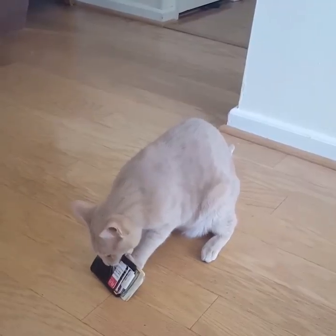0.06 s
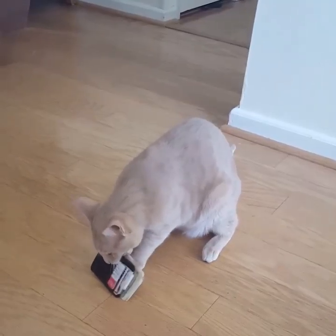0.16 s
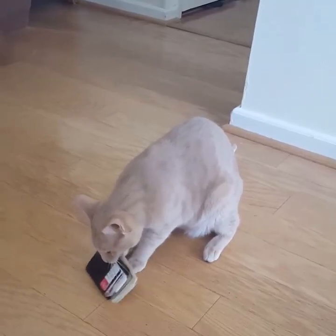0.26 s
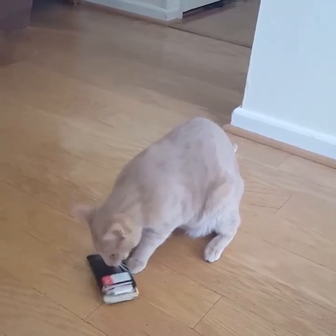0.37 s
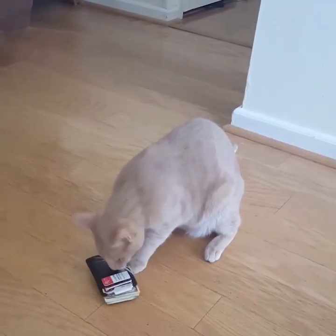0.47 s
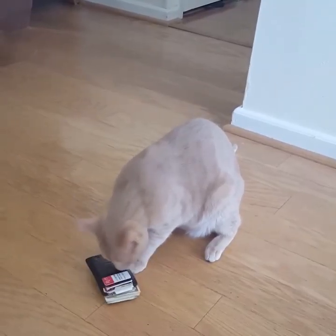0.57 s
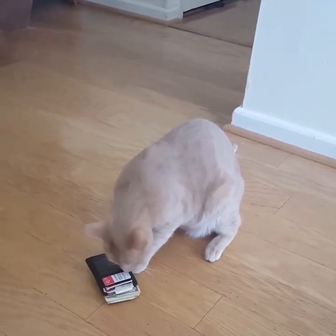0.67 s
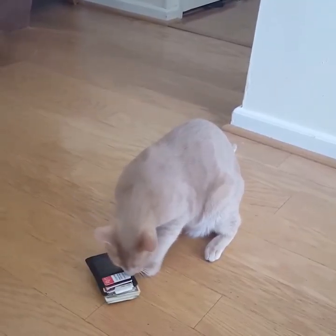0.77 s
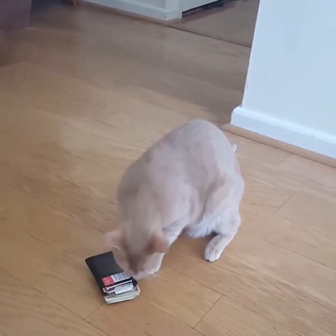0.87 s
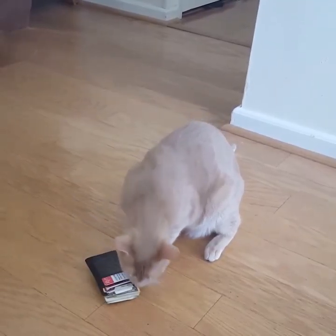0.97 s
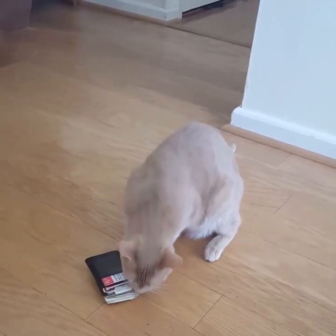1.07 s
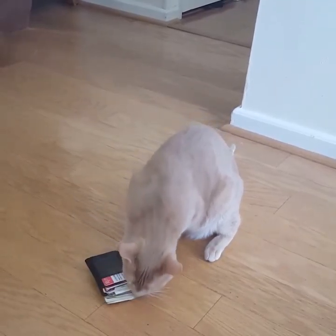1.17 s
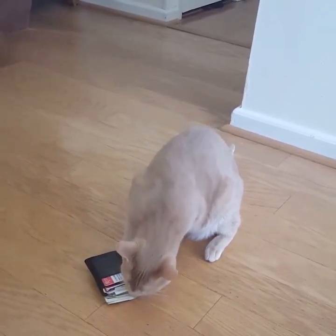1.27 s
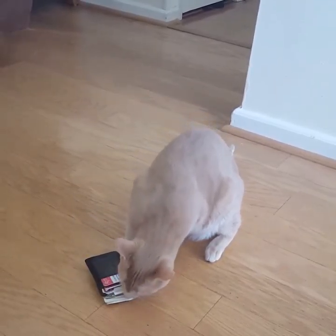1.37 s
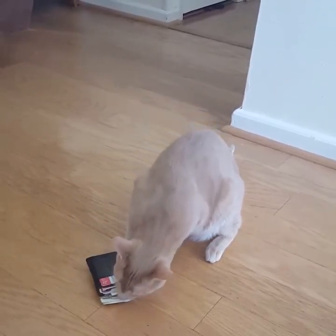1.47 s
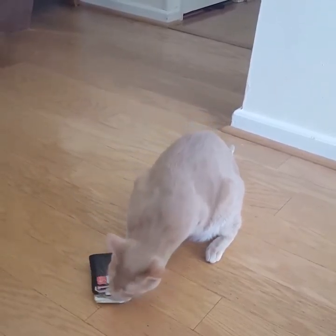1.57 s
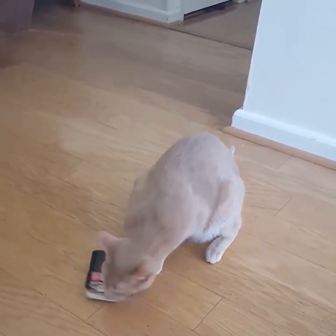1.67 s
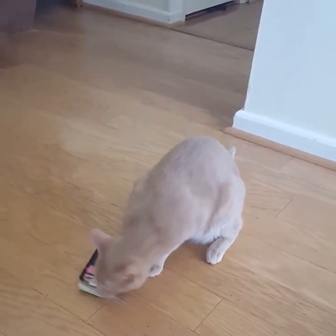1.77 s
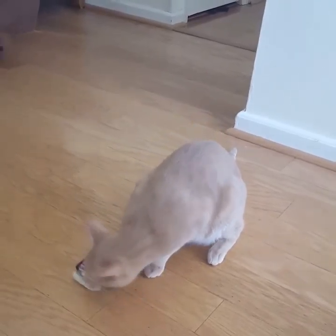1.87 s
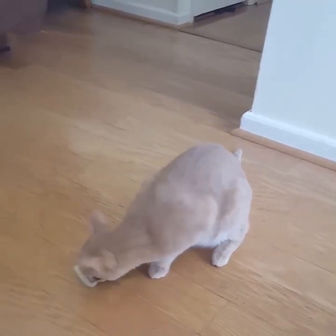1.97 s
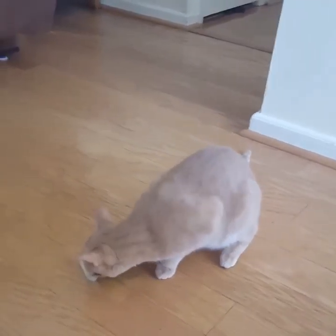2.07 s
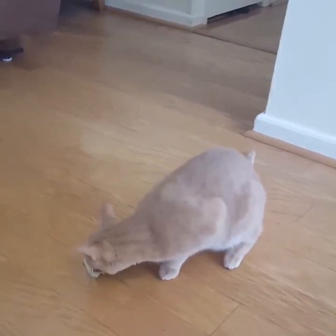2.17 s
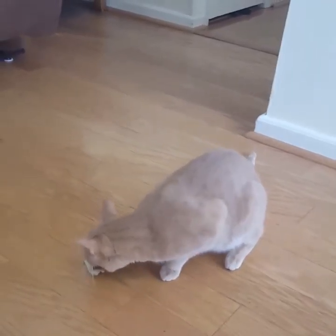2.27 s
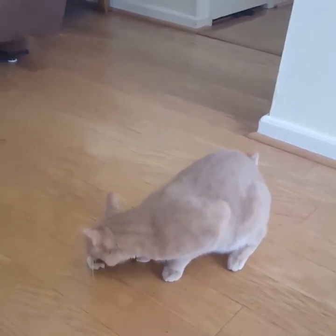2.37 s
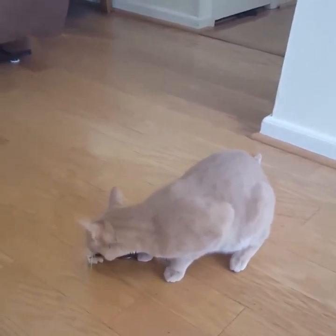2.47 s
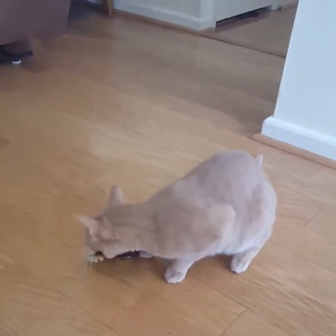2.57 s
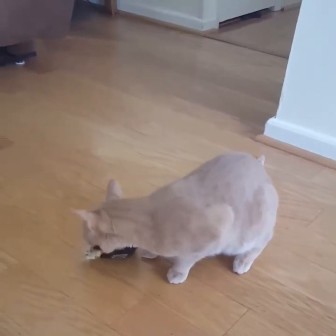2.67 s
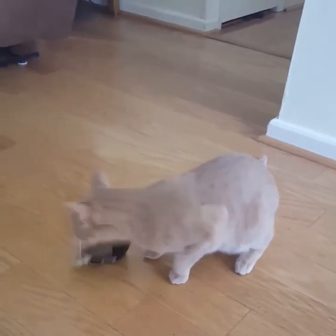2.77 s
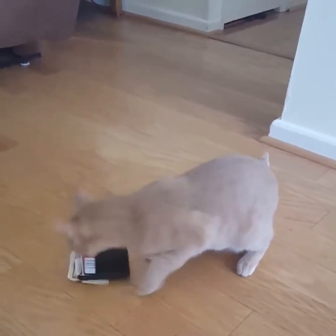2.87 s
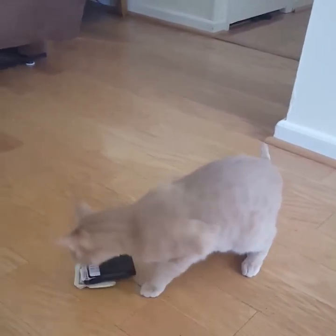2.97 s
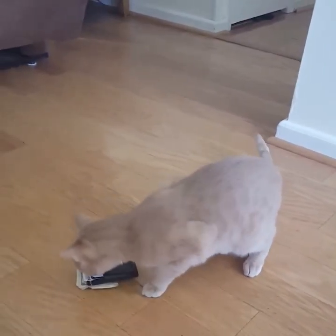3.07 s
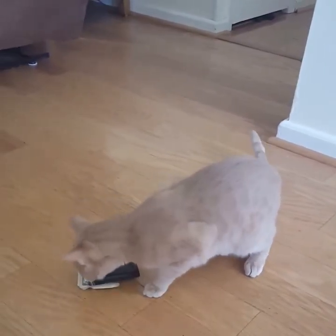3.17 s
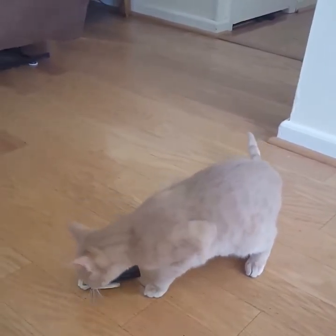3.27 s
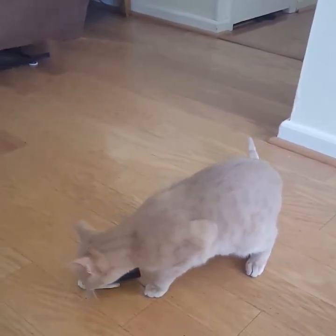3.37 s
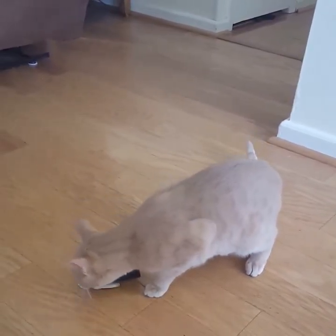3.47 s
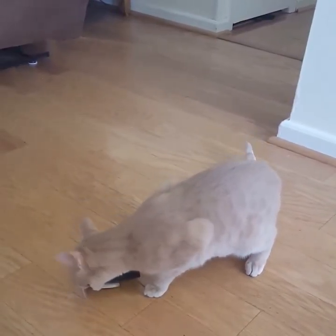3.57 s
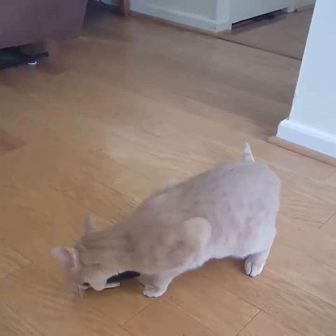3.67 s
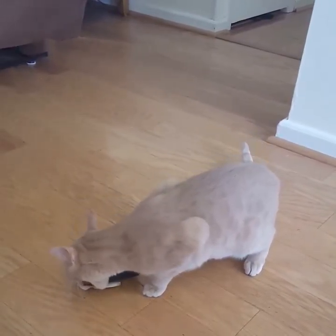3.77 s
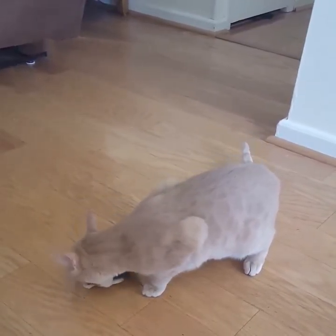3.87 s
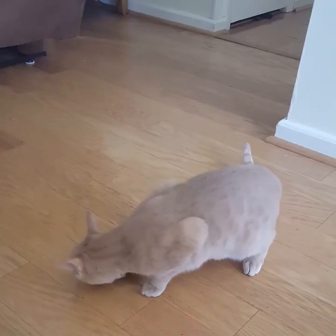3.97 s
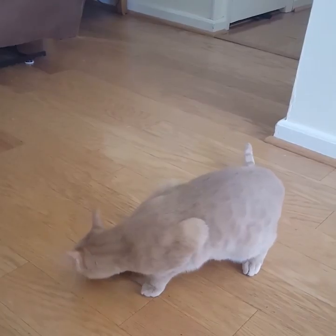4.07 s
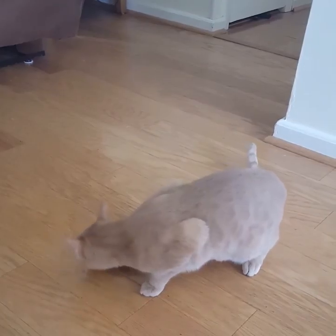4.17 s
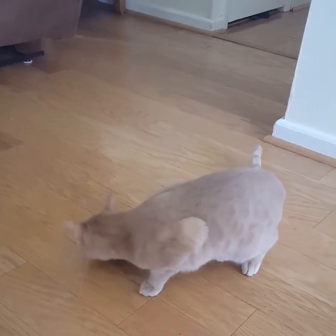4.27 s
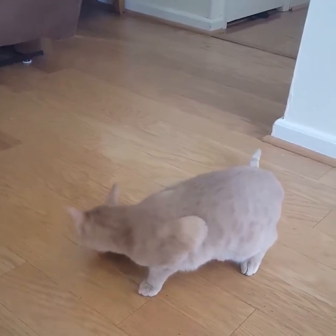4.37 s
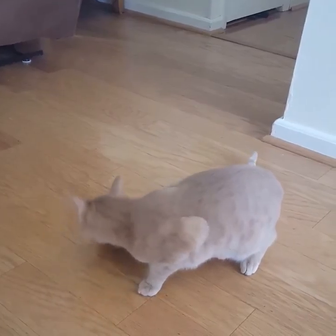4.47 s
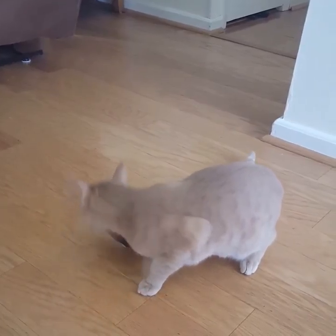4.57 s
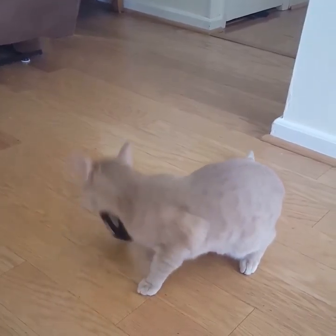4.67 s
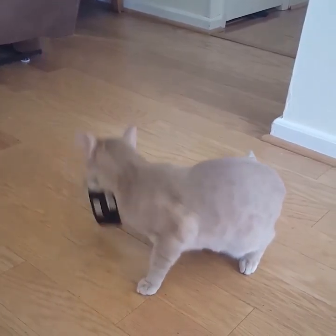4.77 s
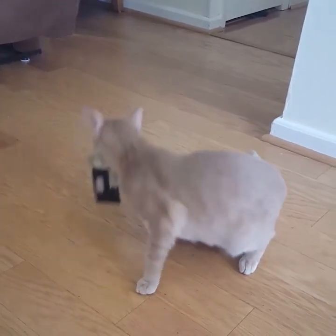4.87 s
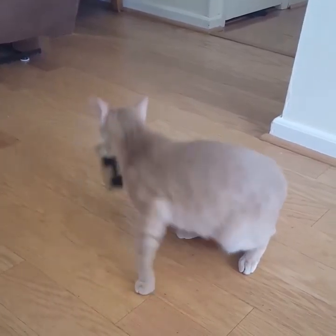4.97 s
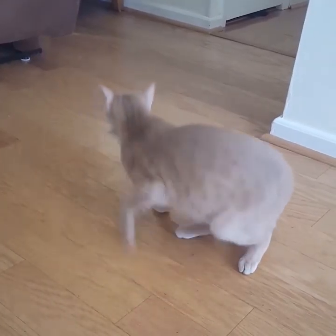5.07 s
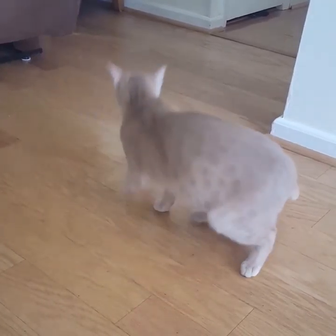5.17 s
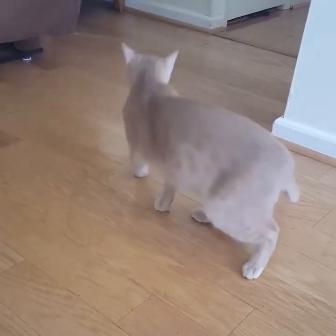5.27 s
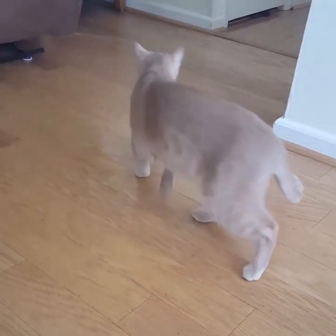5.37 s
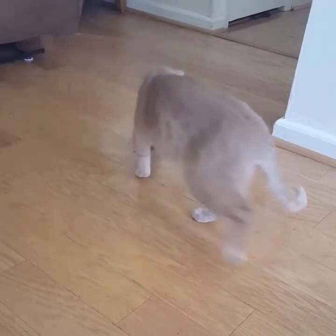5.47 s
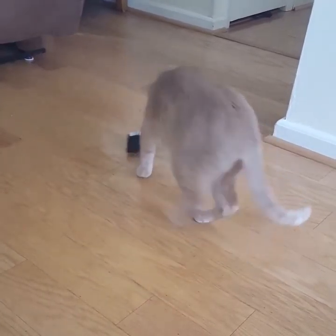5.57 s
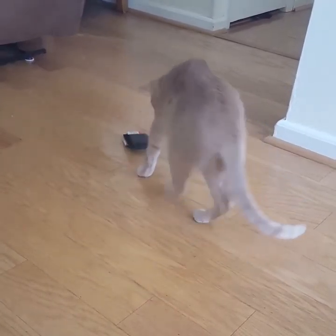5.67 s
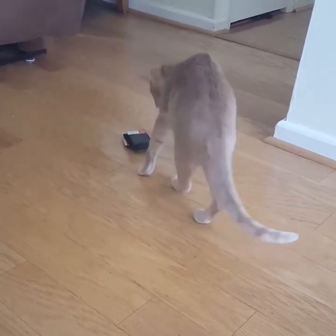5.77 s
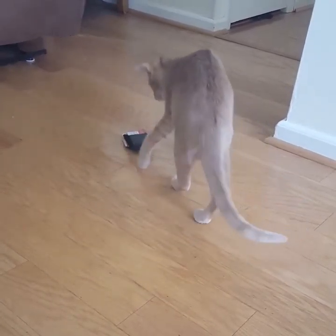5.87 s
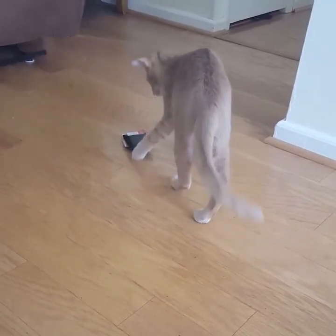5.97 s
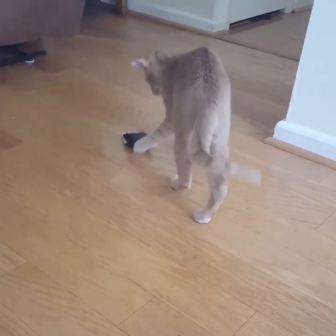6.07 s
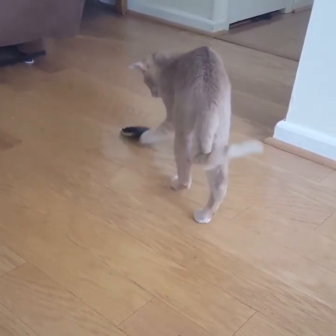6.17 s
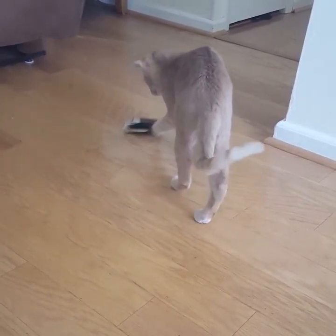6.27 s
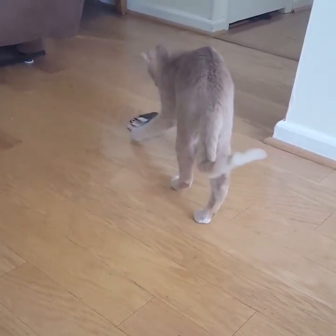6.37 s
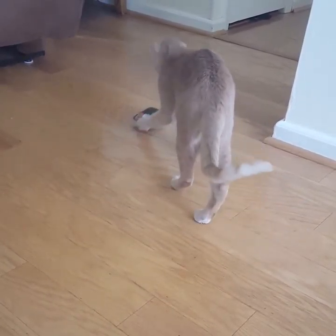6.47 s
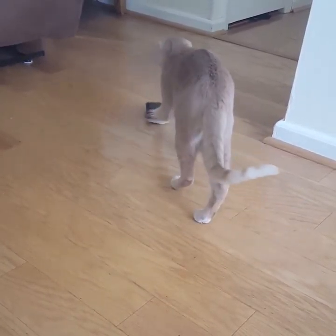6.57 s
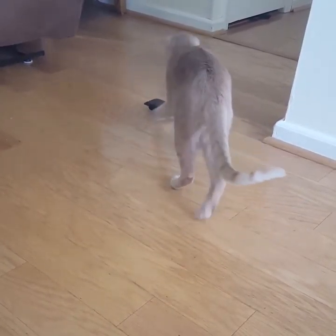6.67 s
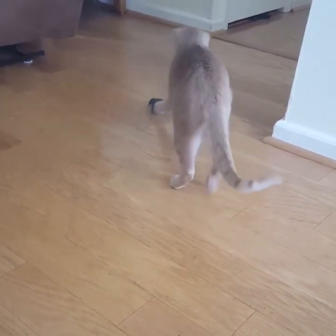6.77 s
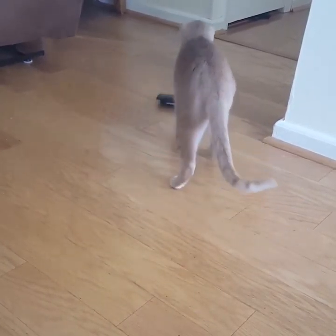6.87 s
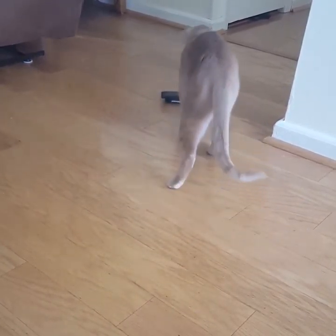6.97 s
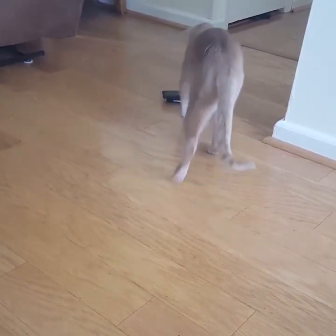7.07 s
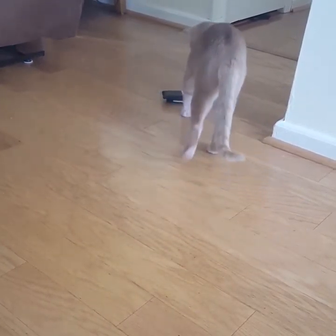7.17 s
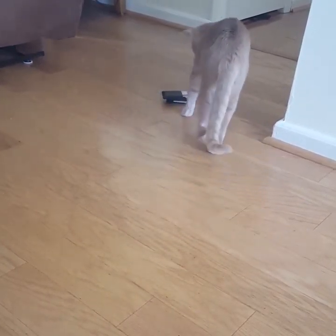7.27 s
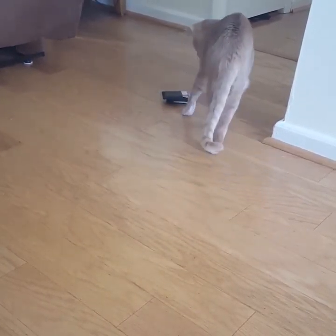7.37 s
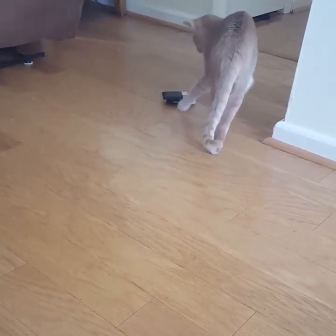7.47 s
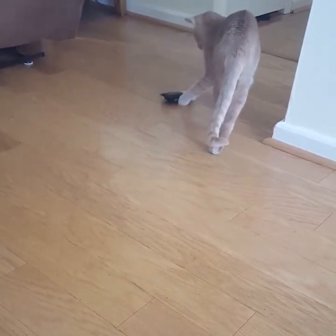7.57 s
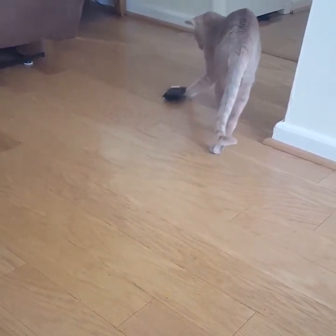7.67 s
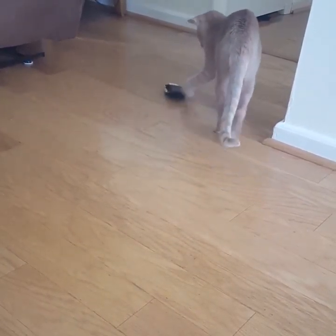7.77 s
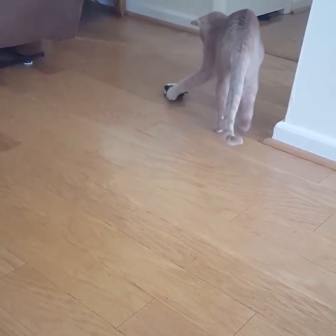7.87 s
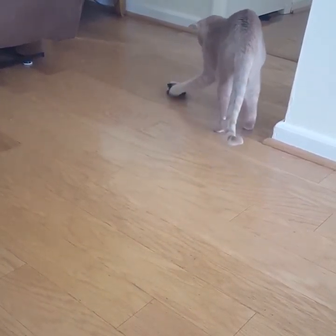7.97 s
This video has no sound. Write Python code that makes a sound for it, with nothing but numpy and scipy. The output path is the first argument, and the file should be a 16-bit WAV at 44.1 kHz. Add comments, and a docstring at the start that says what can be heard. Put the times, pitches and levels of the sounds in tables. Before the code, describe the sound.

A card-filled wallet knocks, scrapes and clatters on a wooden floor in a lively room, over a faint steady motor hum.

```python
"""Cat batting a wallet

A cat paws a card-filled wallet over a wooden floor, lifts it, drops it and bats it along.
Impacts are short pressure pulses that drive dying modes; claws, teeth and cards add noise bursts.
Friction is noise shaped by sliding speed: a rasp of random slips, a smooth swish, judder and squeaks.
Echoes and a diffuse tail form a bare, lively room, where a motor, probably a refrigerator's,
hums faintly as wavering sines over the noise of the air."""
import sys
import numpy as np
from scipy import signal
from scipy.fft import rfft, irfft
from scipy.io import wavfile

SR = 44100
rng = np.random.default_rng(int(sys.argv[2]) if len(sys.argv) > 2 else 0)


def to_wav(s):
    """Save 16-bit WAV."""
    ch = np.atleast_2d(s).T  # columns
    pcm = np.round(np.clip(ch, -1, 1) * 32767)  # PCM
    wavfile.write(sys.argv[1], SR, pcm.astype(np.int16))


N = 354123  # samples

# Blows of wallet on floor (low contact = soft face, high = hard edge):
# start_s, strength_db, contact_hz, ring_db (relative)
BLOWS = [(0.409, -33, 1460, 4), (0.414, -33.5, 2200, 6), (0.5976, -12.5, 1820, 8), (0.6018, -32, 2630, 8),
         (0.6214, -17, 2350, 9), (0.659, -39, 2750, 0), (0.6807, -28, 2210, -6), (0.7008, -22, 1700, 7),
         (2.036, -36, 1490, 1), (2.134, -42, 1100, -6), (2.158, -31, 1860, 0), (2.955, -46, 1510, 7),
         (3.0175, -29, 684, -1), (3.0837, -12, 2070, 1), (3.096, -13.5, 1740, 8), (3.1986, -14.5, 1960, 5),
         (3.2617, -32, 2140, 8), (3.866, -42, 1080, -5), (4.019, -36, 1510, 5), (4.129, -37.5, 1900, -3),
         (4.167, -34.5, 2100, -1), (4.33, -39, 1520, 13), (5.624, -24.5, 486, 5), (5.6363, -21, 750, 3),
         (5.6411, -18, 507, 0), (5.645, -18, 1900, -3), (5.6561, -10, 1340, 6), (5.6586, -20, 384, 3),
         (5.6608, -5, 2780, 5), (5.6645, -10.5, 2350, 16), (5.8134, -11, 1840, 6), (5.8229, -16, 2060, 11),
         (5.8405, -18.5, 1780, 3), (5.9052, -15, 2130, 6.5), (6.0064, -28.5, 1820, -1),
         (6.4941, -27, 890, 18), (6.499, -23, 2020, 3), (6.5748, -25.5, 1490, -5), (6.6922, -27, 1830, 2),
         (6.7604, -29.5, 1610, 10), (6.9799, -38, 1400, 15), (7.093, -20.5, 1300, -2),
         (7.9119, -28.5, 1499, 3), (7.932, -28, 1800, 6)]
# Modes of wallet and boards ringing together: pitch_hz, level_db (relative), t60_s
FLOOR_MODES = [(261.5, -20.5, 0.26), (404, -26, 0.2), (613, -24, 0.073), (860, -53, 0.04), (1103, -25, 0.1),
               (1340, -31, 0.01), (1644, -40, 0.17), (1870, -18, 0.019), (2380, -48, 0.018),
               (3310, -29, 0.027), (5000, -38, 0.011)]
# The cat carries the wallet away, so the room gains on the direct sound: time_s, distance_m
CAT_DISTANCE = [(0, 0.98), (4.8, 0.99), (5.7, 1.11), (6.5, 1.82), (8, 1.73)]
# The wallet never lands square: its far edge follows, weaker and a little harder
FAR_EDGE_DELAY_S, FAR_EDGE_DB, FAR_EDGE_HZ_RATIO = 0.003, -7, 1.32
# Every blow shakes the cards: level for a usual blow, and dB of growth per dB of blow
CARDS_DB, USUAL_BLOW_DB, CARDS_GROWTH = -48.5, -17, 0.51
CARDS_HZ, CARDS_DECAY_S = 4400, 0.001


def knocks(room_db=2, ring_db=0):
    """Impact excitation: two edges clap in turn, drive the modes and shake the cards."""
    out = np.zeros(N)
    for start_s, strength_db, contact_hz, own_ring_db in BLOWS:
        clap = contact(contact_hz)
        far_edge = gain_of(FAR_EDGE_DB) * contact(contact_hz * FAR_EDGE_HZ_RATIO)
        add(clap, FAR_EDGE_DELAY_S * rng.uniform(0.63, 1.4), far_edge)
        ring = signal.fftconvolve(clap, ringing(FLOOR_MODES))[:len(clap)]
        ring = ring / abs(contact(contact_hz)).sum()
        cards_db = CARDS_DB + CARDS_GROWTH * (strength_db - USUAL_BLOW_DB)
        cards = gain_of(cards_db) * scratch(CARDS_HZ, CARDS_DECAY_S)
        blow = gain_of(strength_db) * (clap + gain_of(ring_db + own_ring_db) * ring) + cards
        distance_m = np.interp(start_s, *np.transpose(CAT_DISTANCE))
        add(out, start_s, heard(blow, room_db + 20 * np.log10(distance_m)))
    return out


# Colour of the card-filled wallet: frequency_hz, level_db (relative)
WALLET_COLOUR = [(100, -3), (270, -2.5), (450, 4), (800, 3.5), (1300, -0.5), (1800, 0), (2400, -1.5),
                 (3300, 2), (4200, 4), (6500, 7), (9000, 4), (15000, -21)]


def contact(hz, damping=1.0, size=8192):
    """Impulsive radiation: a stopped flat object pushes air one way, then back; harder is quicker."""
    s = 1j * np.fft.rfftfreq(size, 1 / SR) / hz
    push_and_return = s / (s ** 2 + damping * s + 1) ** 2
    pulse = irfft(causal(WALLET_COLOUR, size) * push_and_return)
    return -pulse / abs(pulse).max()


def causal(spectrum, size):
    """Minimum phase: the given colour becomes a response that starts only at the blow."""
    log_gain = np.log(gain_of(read(spectrum, abs(np.fft.fftfreq(size, 1 / SR)))))
    return np.exp(np.conj(signal.hilbert(log_gain)))[:size // 2 + 1]


def ringing(modes, size=8192):
    """Modal decay: a sum of dying sines, weighted anew at each point of contact."""
    t = np.arange(size) / SR
    weights = rng.uniform(0.55, 0.89, len(modes))
    out = np.zeros(size)
    for weight, (hz, db, t60) in zip(weights, modes):
        out += weight * gain_of(db - 60 * t / t60) * np.sin(2 * np.pi * hz * t)
    return out


# Claws, teeth and card edges catching: start_s, level_db, centre_hz, decay_s
CATCHES = [(0.409, -48, 6240, 0.0056), (0.656, -48, 8800, .002), (1.922, -58, 5940, .01),
           (2.441, -53, 3430, 0.0037), (2.709, -48, 3100, .004), (3.015, -51, 7000, .008),
           (3.0171, -44, 2380, 0.0033), (3.052, -53, 4770, .011), (3.083, -45, 4460, .003),
           (3.203, -47, 4050, .003), (4.235, -53, 5930, .0043), (4.499, -53, 5250, .0079),
           (5.636, -40.5, 3300, 0.04), (5.813, -38, 5300, 0.0045), (5.901, -45, 4100, 0.0024),
           (7.932, -39.5, 7800, 0.00088)]


def ticks(room_db=0):
    """Transient noise: catches are brief bright scratches."""
    out = np.zeros(N)
    for start_s, level_db, centre_hz, decay_s in CATCHES:
        add(out, start_s, gain_of(level_db) * heard(scratch(centre_hz, decay_s), room_db))
    return out


def scratch(hz, decay_s, size=8192):
    """Damped noise: a band around one frequency dies away exponentially."""
    band = [(hz / 4, -16), (hz, 0), (hz * 2, -6), (hz * 4, -20)]  # Hz, dB
    noise = coloured(rng.standard_normal(size), band)
    return noise * np.exp(-np.arange(size) / SR / decay_s)


# Shoves that slide the wallet: top_speed_s, push_s, coast_s,
# rasp_db (edge, relative), swish_db (leather, relative)
SHOVES = [(0.522, 0.063, 0.06, -55.5, -47.5), (1.75, 0.22, 0.3, -65, -71), (1.93, .14, 0.2, -54, -65),
          (2.13, .15, 0.15, -53, -63), (2.26, 0.07, 0.28, -60, -65), (2.70, 0.15, .08, -67, -67),
          (4.2, 0.12, 0.15, -52.5, -56.5), (4.335, 0.09, 0.16, -50.5, -61.5),
          (4.48, 0.071, 0.075, -53, -67), (4.92, 0.15, 0.27, -79, -74), (5.5, .22, 0.12, -69, -73),
          (6.27, 0.085, 0.062, -58, -65), (6.325, 0.039, 0.094, -64, -51), (6.435, 0.083, .1, -53.5, -50),
          (6.565, 0.096, 0.058, -35, -60), (6.69, 0.079, .04, -46, -54.5),
          (6.775, 0.089, 0.1, -35.5, -52.5), (6.88, 0.089, 0.29, -46, -56.5),
          (7.04, 0.071, 0.12, -39.5, -61), (7.115, 0.071, 0.23, -41.5, -56.5), (7.79, 0.06, 0.18, -54, -60),
          (7.89, .09, 0.068, -55, -50.5), (7.934, 0.033, 0.063, -34.5, -46.5)]
FRICTION_POWER = 1.16  # friction noise grows as speed to this power


def stroke(kind):
    """Sliding friction: each shove speeds the wallet up evenly, then the floor brakes it evenly."""
    t, out = np.arange(N) / SR, np.zeros(N)
    for top_s, push_s, coast_s, rasp_db, swish_db in SHOVES:
        speed = np.interp(t, [top_s - push_s, top_s, top_s + coast_s], [0, 1, 0])
        level_db = {"rasp": rasp_db, "swish": swish_db}[kind]
        out += gain_of(level_db) * speed ** FRICTION_POWER
    return out


# Colour of the edge on the wood: frequency_hz, level_db (per Hz, relative)
RASP_COLOUR = [(100, -23), (250, -2), (450, -8), (700, -7), (980, 1), (1300, -0.5), (1800, -1.5),
               (2500, -7), (4000, -14), (7000, -27), (15000, -66)]


def rasp(level_db=-5, slips_per_s=330, spread_db=5, clump_db=4.0, room_db=2.0):
    """Irregular stick-slip: the edge catches and slips on the grain of the wood, in uneven clumps."""
    clumps = gain_of(clump_db * np.clip(drift(27), -1.5, 1.5))
    catches = slips(slips_per_s, spread_db) * clumps
    return heard(gain_of(level_db) * stroke("rasp") * coloured(catches, RASP_COLOUR), room_db)[:N]


def slips(per_s, spread_db):
    """Random point process: catches and releases of uneven size, at an rms of one."""
    sizes = gain_of(spread_db * np.minimum(rng.exponential(1, N), 3)) * rng.choice([-1, 1], N)
    # gamma-distributed gaps: each slip needs a moment to catch again
    gaps = rng.gamma(2, SR / per_s / 2, N // 8)
    moments = np.cumsum(gaps).astype(int)
    return evened(sizes * np.isin(np.arange(N), moments))


# Colour of leather on varnish: frequency_hz, level_db (per Hz, relative)
SWISH_COLOUR = [(300, 15), (1500, 2), (4000, 12.5), (6000, 14), (9000, 9.5), (11000, 4), (13500, 10),
                (15500, -9)]
# Bright fizz of the hardest swishes: frequency_hz, level_db (per Hz, relative)
FIZZ_COLOUR = [(3000, -30), (7000, -11), (11000, -2), (13500, 3), (15500, -4)]


def swish(level_db=-3, flutter_db=2.5, fizz_db=-3, room_db=-4):
    """Smooth friction: countless tiny contacts merge into a hiss that brightens with effort."""
    effort = stroke("swish")
    flutter = gain_of(flutter_db * drift(90))
    hiss = coloured(rng.standard_normal(N) * flutter, SWISH_COLOUR)
    fizz = coloured(rng.standard_normal(N), FIZZ_COLOUR)
    fizz = gain_of(fizz_db) * effort / effort.max() * fizz
    return heard(gain_of(level_db) * effort * (hiss + fizz), room_db)[:N]


# Hard pushes; a row that ends before its start is silent: start_s, peak_s, end_s, level_db (relative)
HARD_PUSHES = [(4.274, 4.326, 4.37, -48), (6.736, 6.783, 6.45, -44), (7.005, 7.05, 7.1, -32.5),
               (7.076, 7.11, 6.48, -35)]
# Resonances that the judder drives: pitch_hz, level_db (relative), t60_s
RATTLE_MODES = [(930, -10, 0.038), (1070, -9, 0.057), (1345, -1, 0.058), (1740, 4, 0.056),
                (1797, 2.5, 0.033)]


def judder(level_db=-5, slips_per_s=260, spread_db=2, room_db=3):
    """Driven resonance: under a hard push, slower and more even slips set the wallet rattling."""
    t, push = np.arange(N) / SR, np.zeros(N)
    for start_s, peak_s, end_s, push_db in HARD_PUSHES:
        push += gain_of(push_db) * np.interp(t, [start_s, peak_s, end_s], [0, 1, 0])
    rattle = signal.fftconvolve(slips(slips_per_s, spread_db), ringing(RATTLE_MODES))[:N]
    return heard(gain_of(level_db) * push * evened(rattle), room_db)[:N]


# Thin squeaks of leather and cards: start_s, length_s, pitch_hz, level_db
THIN_SQUEAKS = [(2.268, 0.22, 2110, -65.5), (5.918, 0.053, 2200, -39)]


def squeaks(waver=0.013, room_db=-5):
    """Regular stick-slip: brief periodic slipping gives a thin, unsteady tone."""
    out, wander = np.zeros(N), drift(150)
    for start_s, length_s, pitch_hz, level_db in THIN_SQUEAKS:
        pitch = pitch_hz * (1 + waver * wander[int(start_s * SR):][:int(length_s * SR)])
        tone = np.sin(2 * np.pi * np.cumsum(pitch) / SR)
        add(out, start_s, gain_of(level_db) * np.hanning(len(pitch)) * tone)
    return heard(out, room_db)[:N]


# Nearest walls and furniture: delay_s (nominal), gain (amplitude)
NEAR_ECHOES = [(.0046, 0.36), (.0097, 0.28), (0.0127, .2), (0.02, 0.057)]


def heard(x, room_db):
    """Superposition of paths: direct sound, near echoes that shift from spot to spot, and the tail."""
    response = gain_of(room_db) * room()
    response[0] += 1
    for delay_s, gain in NEAR_ECHOES:
        response[int(delay_s * rng.uniform(.9, 1.1) * SR)] += gain
    return signal.fftconvolve(x, response)


# Reverberation time: frequency_hz, t60_s
TAIL_T60 = [(100, 1.8), (300, .5), (800, 0.56), (2000, 0.52), (3300, 0.4565), (4300, .5), (8000, 0.53),
            (15000, 0.48)]
# Colour of the reverberation: frequency_hz, level_db (relative)
TAIL_COLOUR = [(100, -9), (260, -6.5), (430, -5), (700, -3), (1500, -3), (2300, 2.5), (3300, 2), (4300, -2),
               (6000, -3.5), (15000, 0)]


def room(build_s=0.00059, size=30720):
    """Diffuse reverberation: dense reflections from one spot, each band dying at its own speed."""
    hz, t, bands = signal.stft(rng.standard_normal(size), SR, nperseg=512)
    decay_db = 60 * t / read(TAIL_T60, hz)[:, None]
    bands = bands * gain_of(read(TAIL_COLOUR, hz)[:, None] - decay_db)
    tail = signal.istft(bands, SR, nperseg=512)[1][:size]
    tail = tail * (1 - np.exp(-np.arange(size) / SR / build_s))
    return tail / np.linalg.norm(tail)


# Lines of the motor: pitch_hz, level_db (rms, about which it wavers)
MOTOR_LINES = [(59.2, -69.5), (78, -73.5), (98.2, -70.5), (119.5, -72.5), (126.3, -69), (175.2, -60.5),
               (189.8, -69), (226, -78), (236.9, -62.5), (251.7, -62), (296.1, -63), (349.9, -71),
               (394.3, -81.5), (1127.6, -68.5), (1187, -72)]
# Still air of the room: frequency_hz, level_db (per Hz, relative)
AIR_COLOUR = [(20, -10), (42, -22), (60, -7.5), (105, -4), (145, -10.5), (190, 1.5), (260, -1.5),
              (400, -11.5), (700, -13), (1150, -20.5), (2000, -25), (5000, -33.5), (11000, -40),
              (14500, -38.5)]
AIR_DB = -55.5  # rms


def hum(waver_db=1.0, phase_wander=0.76):
    """Periodic machinery: motor lines waver slightly in level and phase (radians), over room air."""
    t = np.arange(N) / SR
    out = gain_of(AIR_DB) * coloured(rng.standard_normal(N), AIR_COLOUR)
    knots = np.linspace(0, t[-1], num=48)
    for hz, db in MOTOR_LINES:
        swell, wander = (np.interp(t, knots, row) for row in rng.standard_normal((2, len(knots))))
        phase = 2 * np.pi * (hz * t + rng.random()) + phase_wander * wander
        out += np.sqrt(2) * gain_of(db + waver_db * swell) * np.sin(phase)
    return out


def gain_of(db):
    """Logarithmic level: decibels to amplitude."""
    return 10 ** (np.asarray(db) / 20)


def evened(x):
    """Power normalisation: scales to an rms of one."""
    return x / np.sqrt(np.mean(x ** 2) + 1e-20)


def read(points, hz):
    """Logarithmic interpolation: reads a table along a log frequency axis."""
    f, value = np.transpose(points)
    return np.interp(np.log(hz + 1), np.log(f + 1), value)


def add(mix, start_s, sound):
    """Superposition: adds a sound into the mix from its start."""
    part = mix[round(start_s * SR):][:len(sound)]
    part += sound[:len(part)]


def coloured(x, spectrum):
    """Spectral shaping: filters x by a table of levels, to an rms of one."""
    gain = gain_of(read(spectrum, np.fft.rfftfreq(len(x), 1 / SR)))
    return evened(irfft(rfft(x) * gain, len(x)))


def drift(rate):
    """Low-passed noise: slow random wandering, up to about rate turns a second."""
    hz = np.fft.rfftfreq(N, 1 / SR)
    return evened(np.fft.irfft(rfft(rng.standard_normal(N)) * np.exp(-(hz / rate) ** 2), N))


def scene():
    """Linear superposition: wallet and room, in mono."""
    return (hum() + knocks() + ticks() + rasp() + judder() + squeaks() + swish())[None]


def record(dry, ceiling=0.42, edge_hz=14900):
    """Soft saturation and band limiting: rounds off the very loudest peaks, then cuts the top."""
    limited = dry / (1 + (dry / ceiling) ** 4) ** (1 / 4)
    lowpass = signal.firwin(255, edge_hz, window=("kaiser", 8), fs=SR)
    return signal.oaconvolve(limited, lowpass[None], "same")


dry = scene()
out = record(dry)
to_wav(out)
```